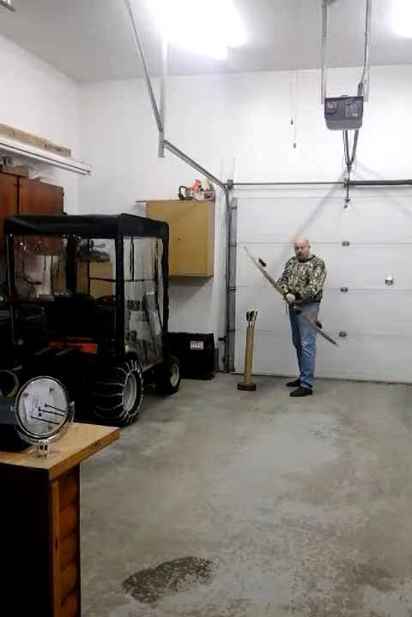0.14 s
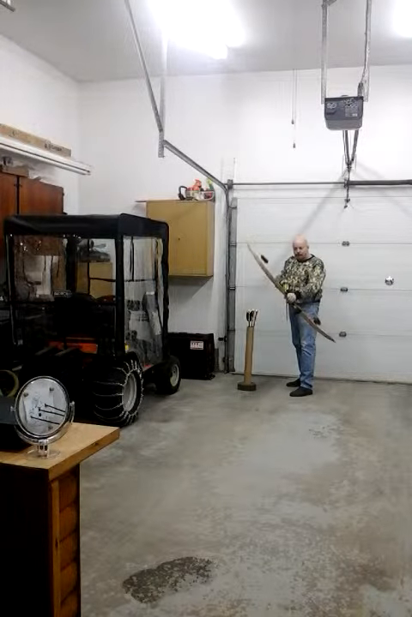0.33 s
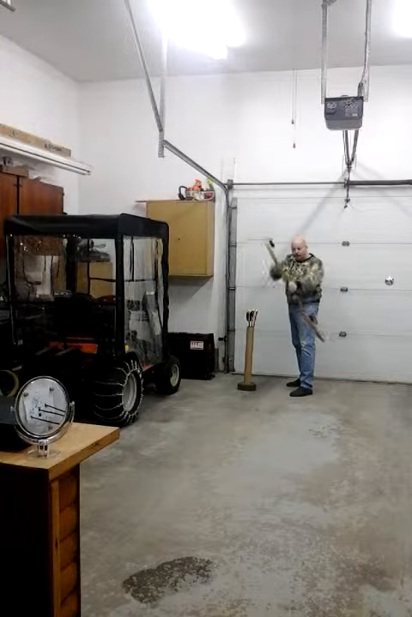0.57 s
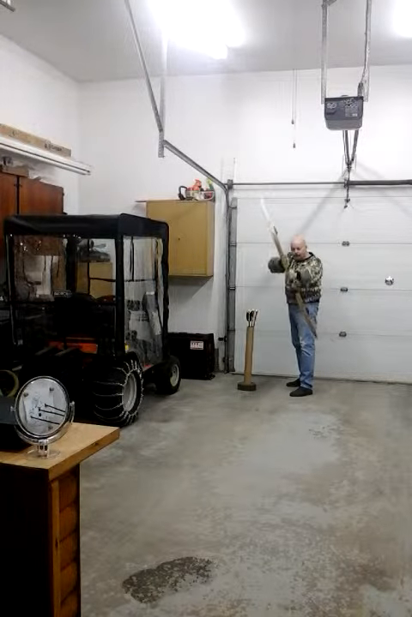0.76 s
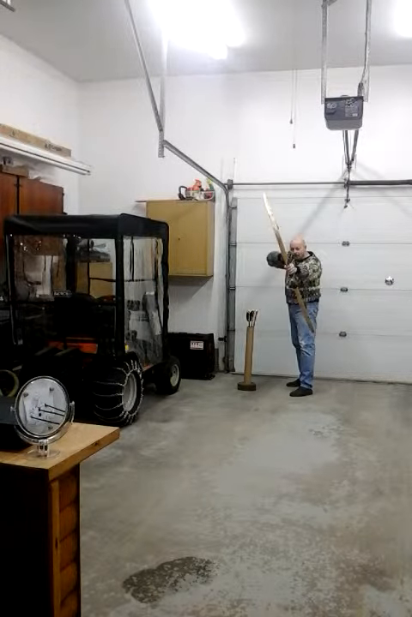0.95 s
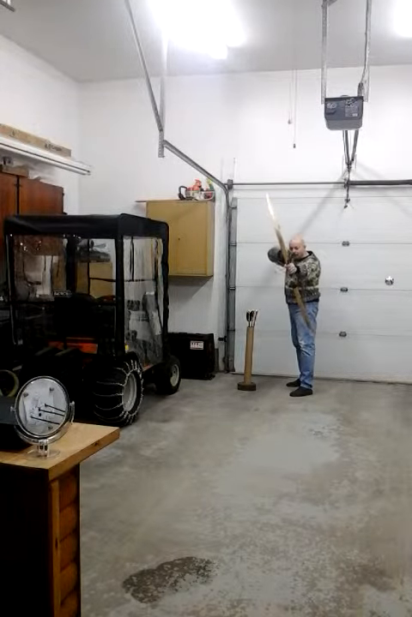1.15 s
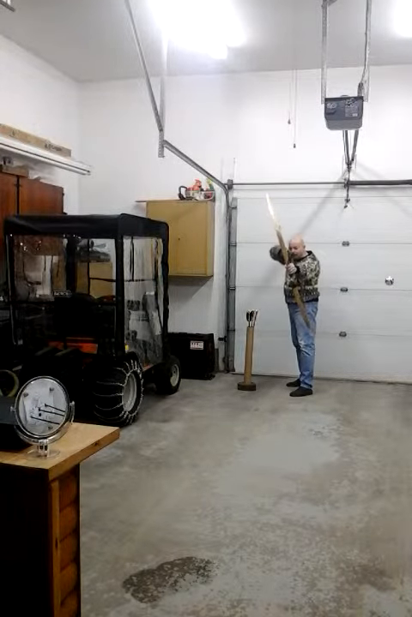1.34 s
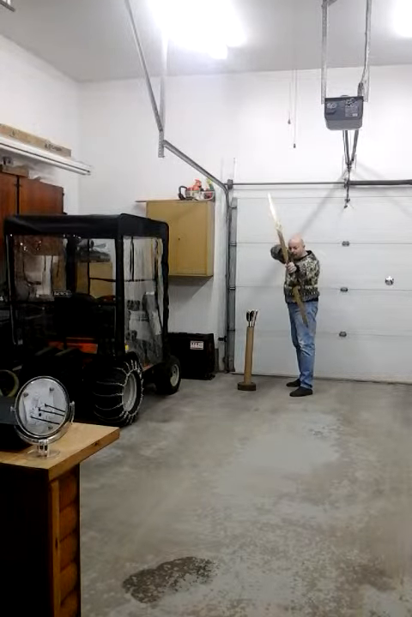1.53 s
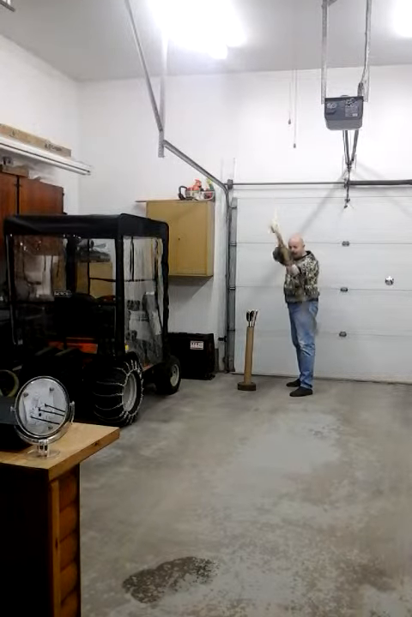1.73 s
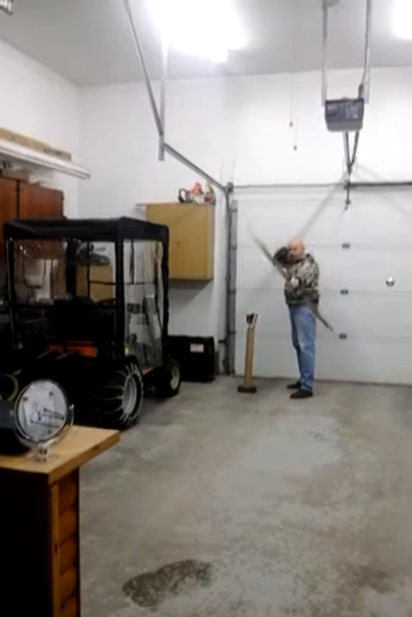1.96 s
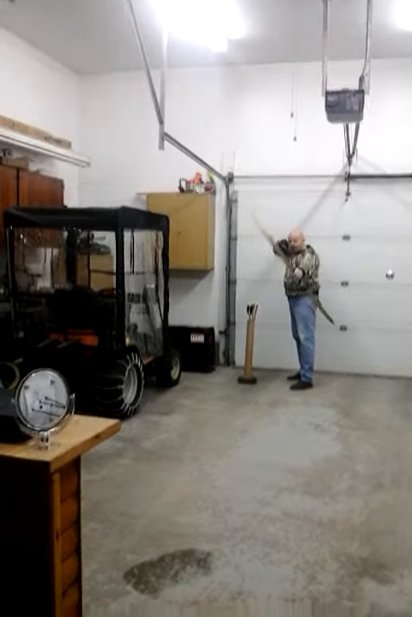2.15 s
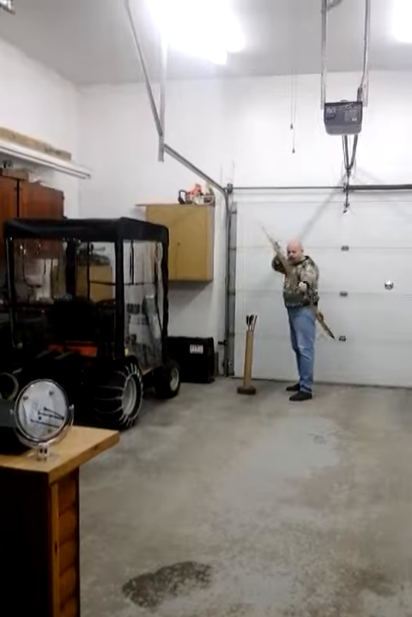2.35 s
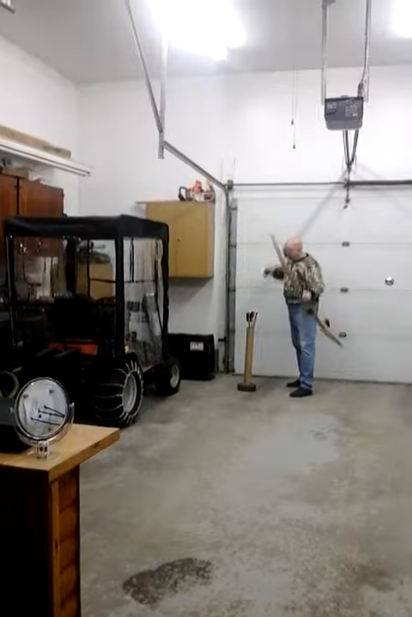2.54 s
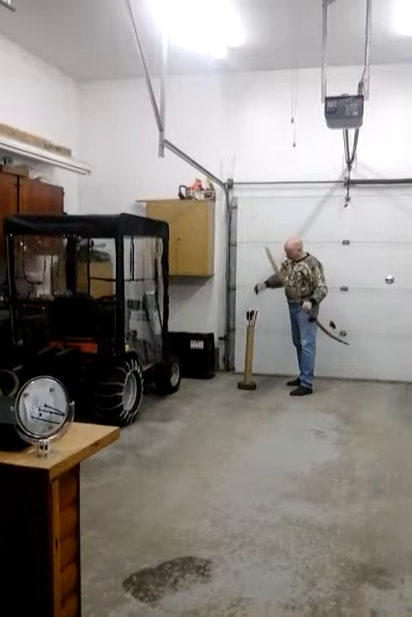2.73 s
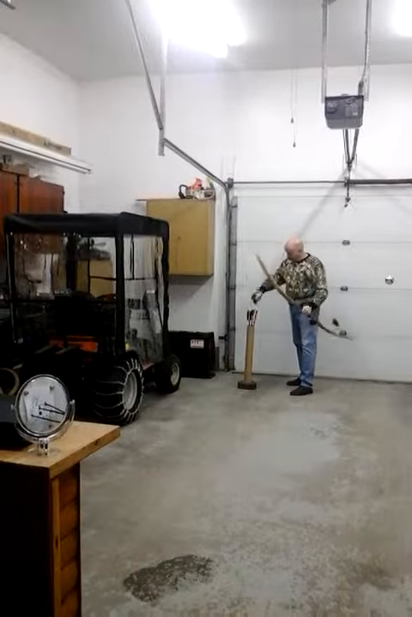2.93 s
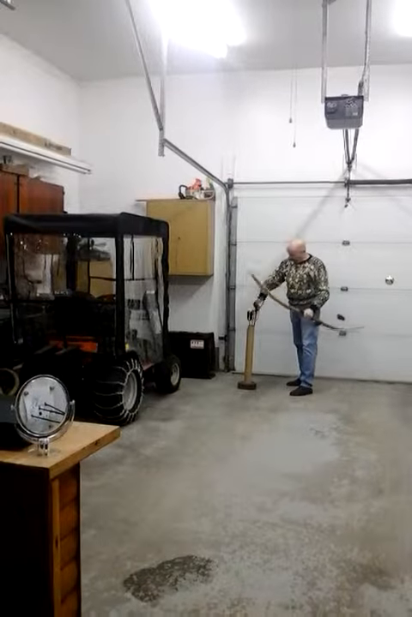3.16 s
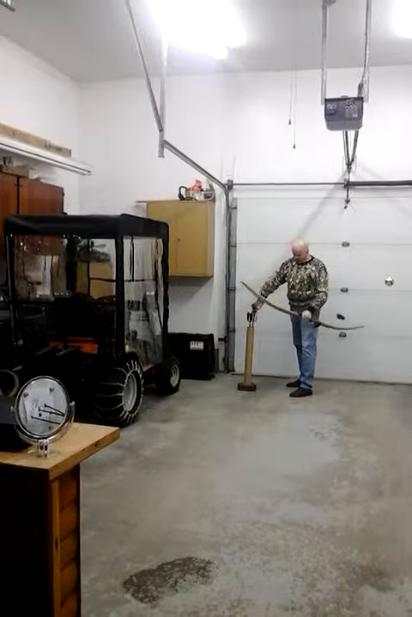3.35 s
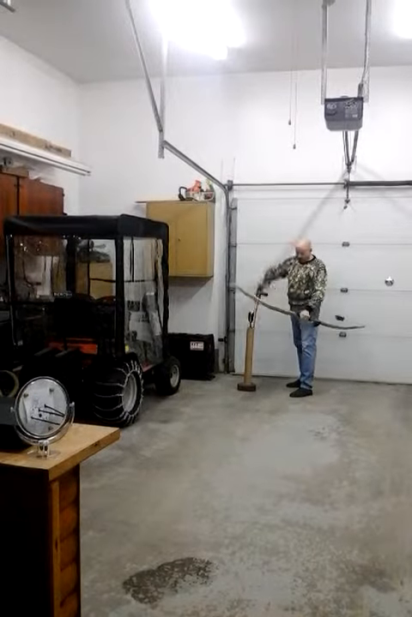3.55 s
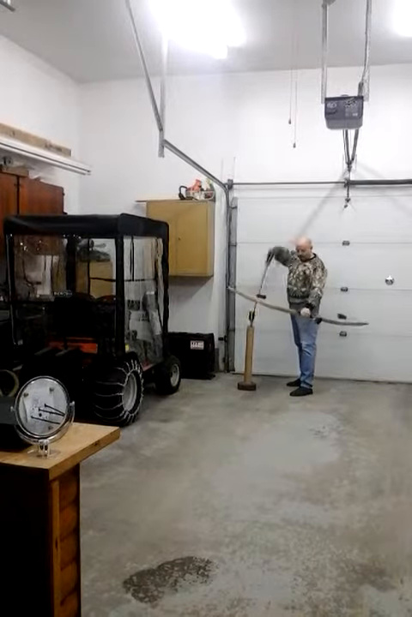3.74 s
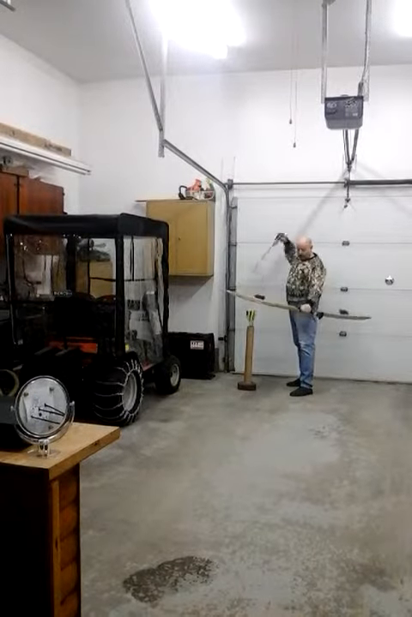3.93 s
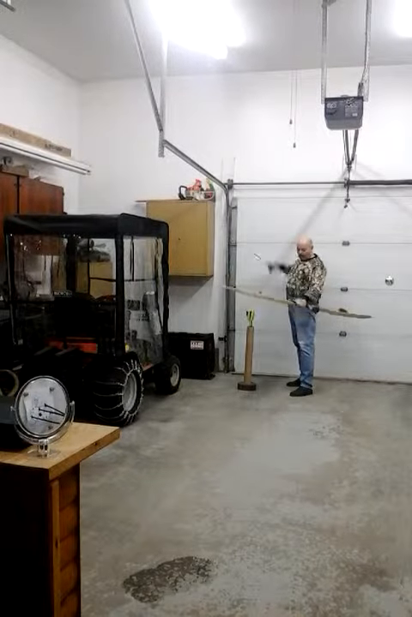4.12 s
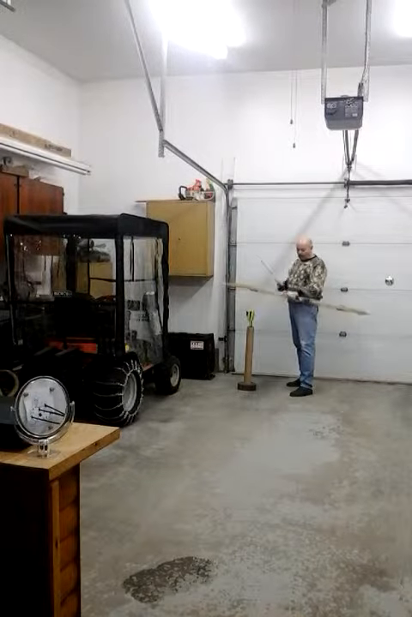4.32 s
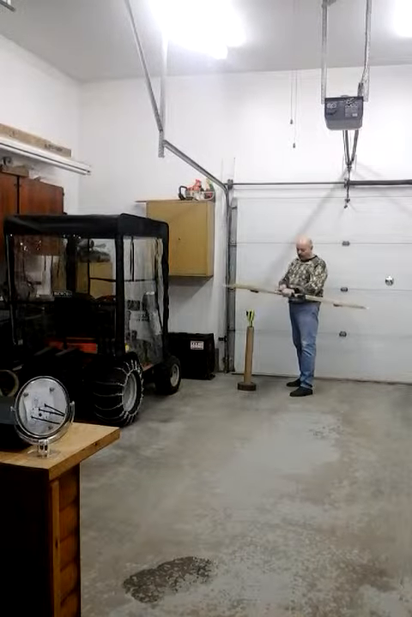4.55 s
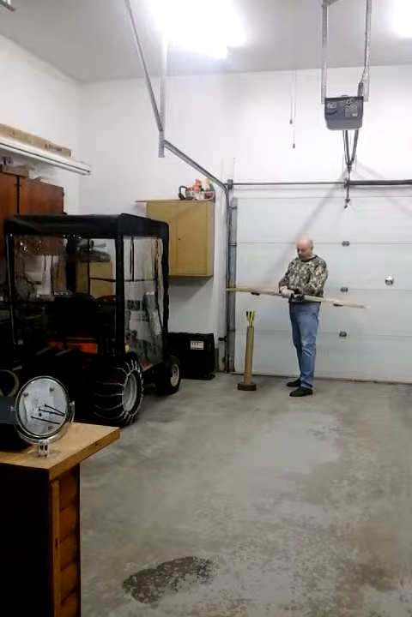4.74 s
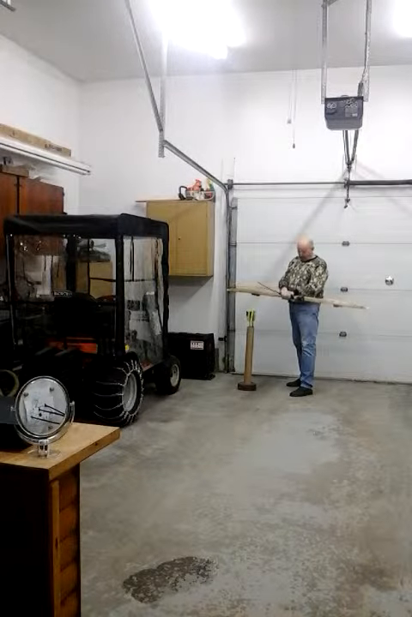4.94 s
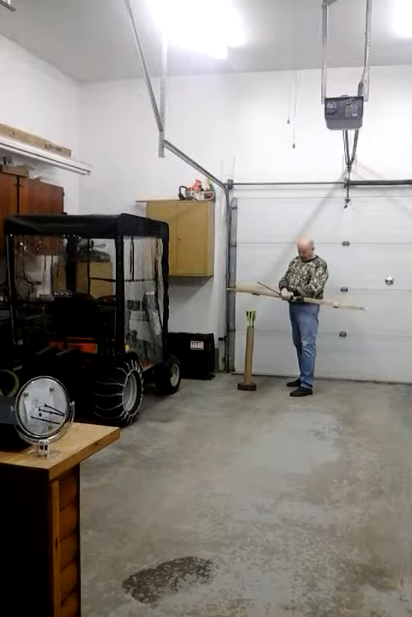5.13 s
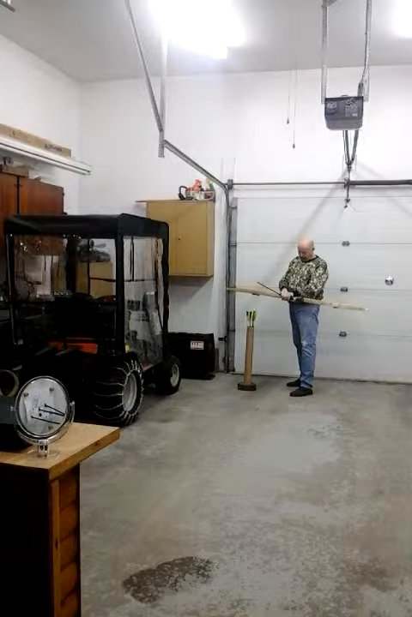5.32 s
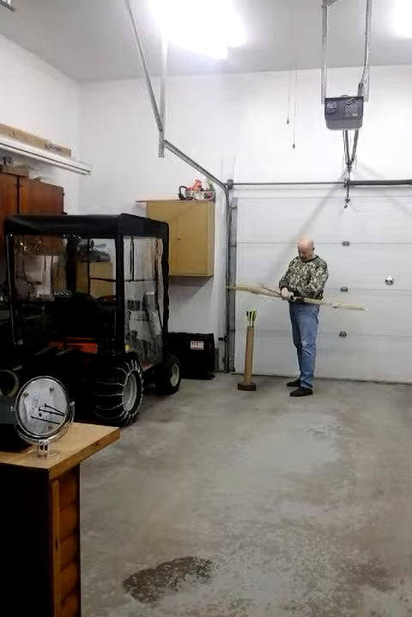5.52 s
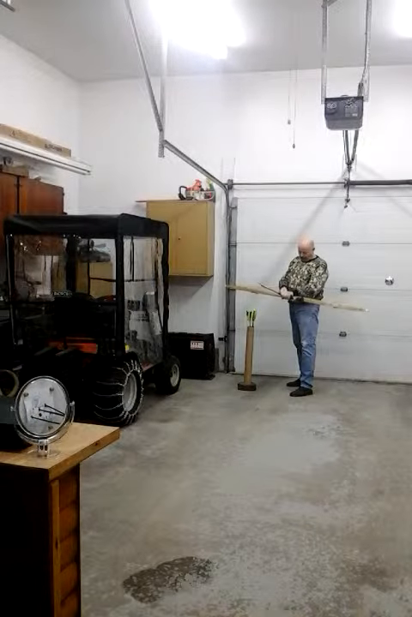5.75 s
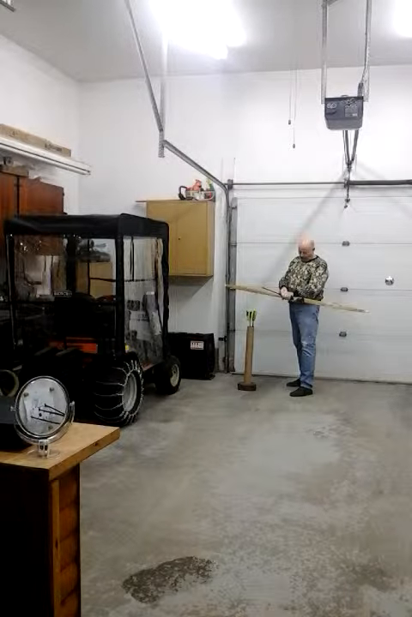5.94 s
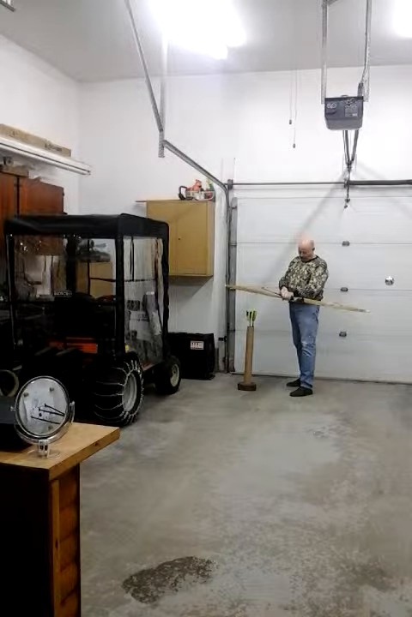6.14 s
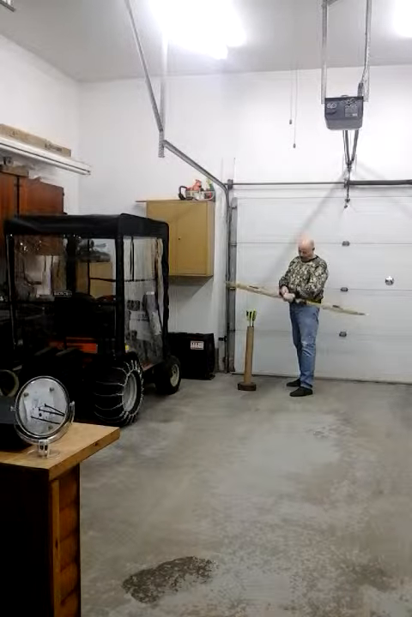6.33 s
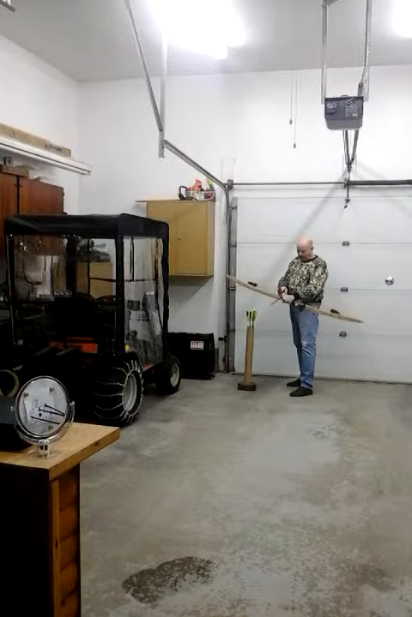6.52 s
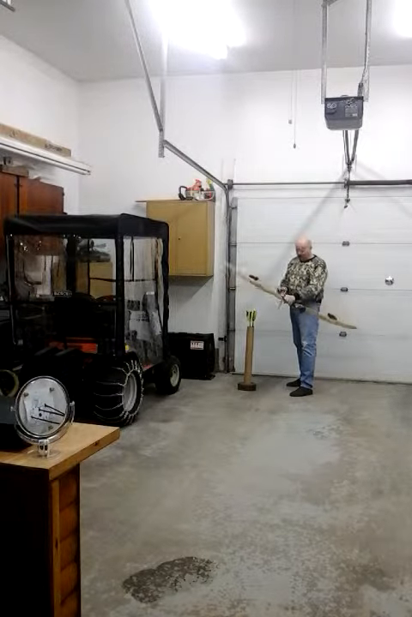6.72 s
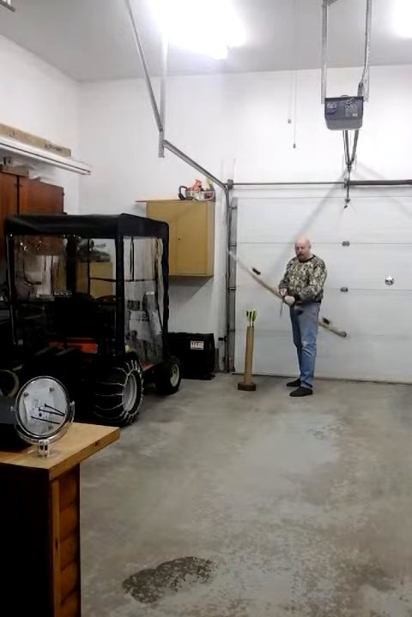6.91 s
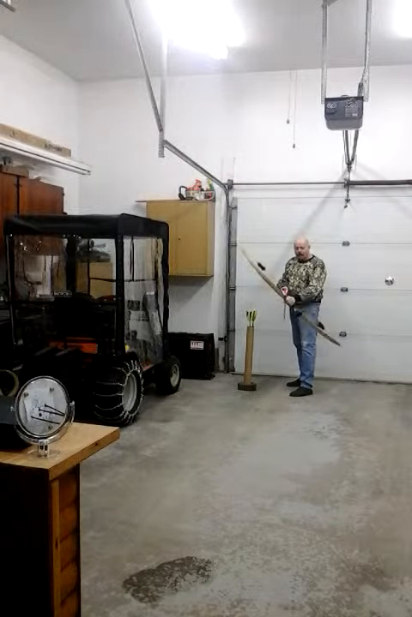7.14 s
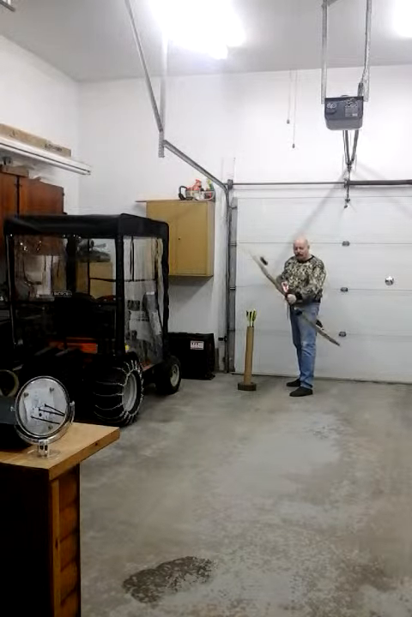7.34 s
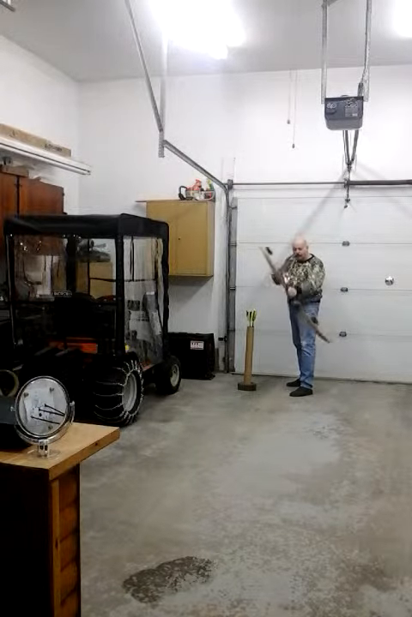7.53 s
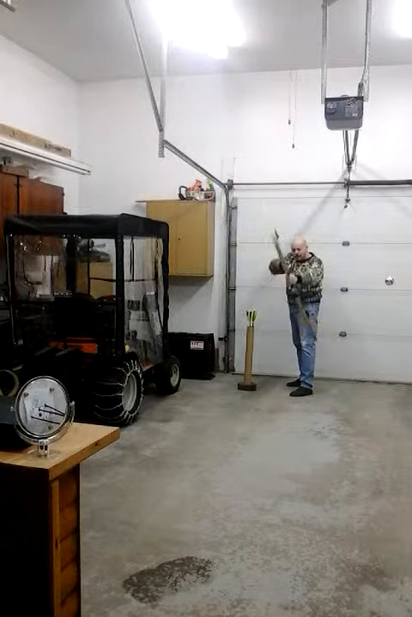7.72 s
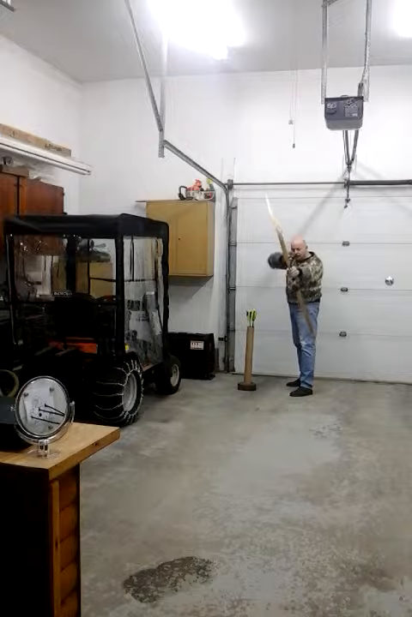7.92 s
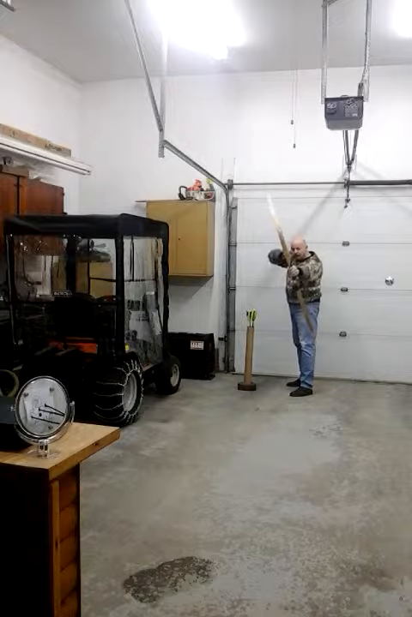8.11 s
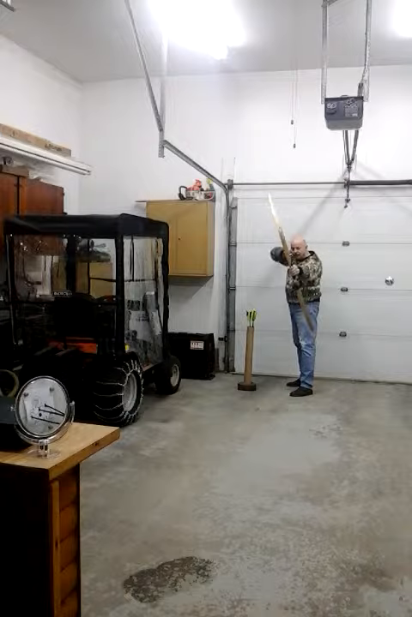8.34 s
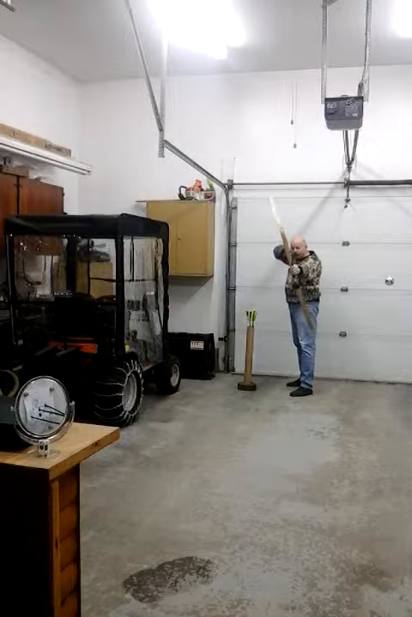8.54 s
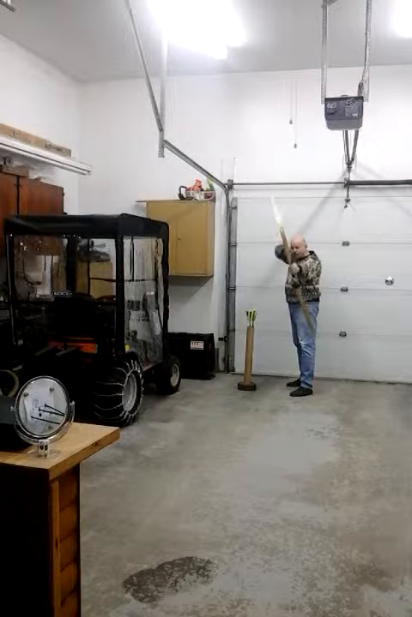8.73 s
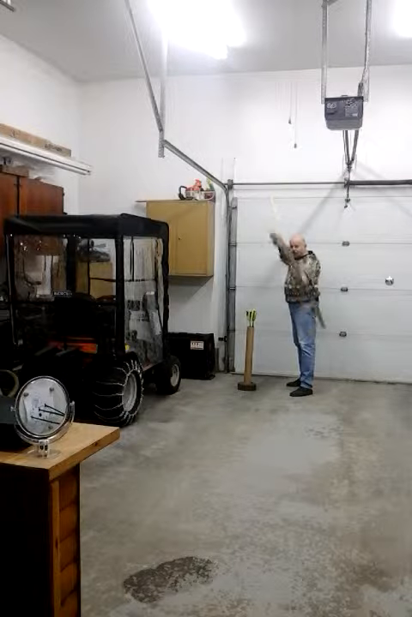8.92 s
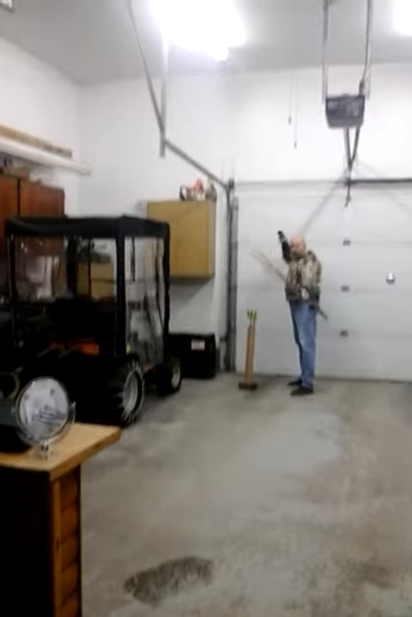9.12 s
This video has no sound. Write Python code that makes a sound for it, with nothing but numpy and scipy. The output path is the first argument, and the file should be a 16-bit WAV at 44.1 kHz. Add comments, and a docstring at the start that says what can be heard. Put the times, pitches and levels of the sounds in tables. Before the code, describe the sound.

Two sharp bow shots, each with a hard target knock a split second later, separated by clattering arrow shafts and small clicks over faint lamp hum.

```python
"""A bare, echoing garage: an archer looses a wooden bow twice, on a bed of lamp hum and room air.
The string cracks as shaped noise and resonances; about 160 ms later the arrow knocks into the target.
Between the shots an arrow rattles out of its stand, as grazes, shaft ringing and hollow knocks.
Small nocking clicks and grainy sleeve rustles fill the gaps.
The microphone pair peaks near 5.7 kHz and hears the archery's bass in opposite phase."""
import sys
import numpy as np
from scipy import signal
from scipy.fft import rfft, irfft, next_fast_len
from scipy.io import wavfile
from scipy.ndimage import uniform_filter1d

SR = 44100
rng = np.random.default_rng(int(sys.argv[2]) if len(sys.argv) > 2 else 0)


def wrap_up_sound(samples):
    """Save the sound to the file named by the first command line argument, as 16-bit audio."""
    columns = np.atleast_2d(samples).T
    # keep every value between -1 and 1, then stretch to whole-number steps
    tamed = np.clip(columns, -1, 1)
    steps = np.round(tamed * 32767).astype(np.int16)
    wavfile.write(sys.argv[1], SR, steps)


N = 408807
MAINS_HZ = 60

# ringing of the loose arrow shaft: (frequency [Hz], level [dB], t60 [s])
SHAFT_RING = [(1270, -20, 0.2), (2245, -10, 0.062), (2910, -8.5, 0.091), (3460, -0.5, 0.1),
              (4315, 6.5, 0.049), (4870, -3, 0.09), (5710, -1.5, 0.091)]


def amp(db):
    """Decibels to gain."""
    return 10 ** (np.asarray(db) / 20)


def unit(x):
    """x at rms 1."""
    return x / np.sqrt(np.mean(x ** 2) + 1e-20)


def along(points, hz):
    """(Hz, value) points read on a log frequency axis."""
    point_hz, values = np.transpose(points)
    return np.interp(np.log(hz + 1), np.log(point_hz), values)


def second():
    """The times and the frequencies of a one-second sound."""
    return np.arange(SR) / SR, np.fft.rfftfreq(SR, 1 / SR)


def filtered(x, response):
    """x, as long as the scene, through a response given as a function of frequency."""
    size = next_fast_len(N + SR // 2)
    spectrum = rfft(x, size) * response(np.fft.rfftfreq(size, 1 / SR))
    return irfft(spectrum, size)[..., :N]


def causal(x, gain):
    """One second of sound through the minimum-phase filter with this gain, so nothing rings early."""
    cepstrum = irfft(np.log(gain), SR)
    # fold the cepstrum onto positive time
    cepstrum[1:SR // 2] *= 2
    cepstrum[SR // 2 + 1:] = 0
    return irfft(rfft(x) * np.exp(rfft(cepstrum)), SR)


def coloured(x, spectrum):
    """One second of sound shaped by a (Hz, dB) curve."""
    return causal(x, amp(along(spectrum, second()[1])))


def even(x, smooth_hz=400):
    """A burst evened out so that it has no broad colour of its own."""
    # one bin is 1 Hz wide
    power = uniform_filter1d(np.abs(rfft(x)) ** 2, size=round(smooth_hz))
    return causal(x, (np.abs(power) + 1e-9) ** -.5)


def resonate(x, modes):
    """One second of sound through parallel (Hz, width Hz, dB) resonances of alternating sign."""
    f = second()[1]
    body = 0
    for k, (centre, width, db) in enumerate(modes):
        damping = 1j * f * width
        body = body + (-1) ** k * amp(db) * damping / (centre * centre - f * f + damping)
    return irfft(rfft(x) * body, SR)


def ringing(modes, attack_s=.002):
    """Decaying sine (Hz, dB, t60 s) modes, struck at new strengths every time."""
    t = second()[0]
    ring = np.zeros(SR)
    for hz, level_db, t60 in modes:
        struck_db = level_db + rng.normal(0, 0.96)
        ring += amp(struck_db - 60 * t / t60) * np.sin(2 * np.pi * hz * t)
    return ring * (1 - np.exp(-t / attack_s))


def contact(t60, grit):
    """A sharp push together with a dying crunch."""
    t = second()[0]
    crunch = rng.standard_normal(SR) * amp(-60 * t / t60)
    return even((t == 0) + grit * crunch / np.linalg.norm(crunch))


def graze(rise_s, fall_s, lead_s):
    """A brief scrape that swells to its peak at lead_s and dies away."""
    t = second()[0] - lead_s
    swell = np.exp(np.minimum(t / rise_s, -t / fall_s))
    return even(rng.standard_normal(SR) * swell)


def rub(length_s, grain_db=4):
    """One grainy stroke of cloth or fingers: noise of jumpy strength under a half-sine swell."""
    # cloth spectrum: (frequency [Hz], level per Hz [dB])
    cloth = [(60, -26.5), (200, 1), (700, 0.5), (1500, -3), (3300, -4), (4700, 0), (5800, 3), (7500, -6.5),
             (10000, -11), (15000, -24.5)]
    stroke = np.sin(np.pi * np.minimum(second()[0] / length_s, 1))
    grain = amp(grain_db * rng.standard_normal(SR))
    return coloured(stroke * rng.standard_normal(SR) * grain, cloth)


def garage(x, db, direct=0, echo=0, echo_s=0.059, build_s=0.0019):
    """x in a decaying noise tail, as sum and difference channels; its first 0.1 s has rms level db."""
    # reverberation of the garage: (frequency [Hz], t60 [s])
    decay = [(80, 0.34), (250, .8), (700, 0.88), (1800, 0.98), (3000, 0.87), (5500, 0.72), (8000, .55),
             (14000, 0.16)]
    hz, s, cells = signal.stft(rng.standard_normal((2, SR)), SR, nperseg=256)
    cells = cells * amp(-60 * s / along(decay, hz)[:, None])
    tail = signal.istft(cells, SR, nperseg=256)[1][:, :SR]
    tail *= 1 - np.exp(-second()[0] / build_s)
    tail /= np.linalg.norm(tail[0])
    # the far wall throws back a bunch of reflections
    tail *= 1 + echo * np.exp(-((second()[0] - echo_s) / 0.003) ** 2)
    tail[:, 0] += direct
    wet = signal.fftconvolve(x[None], tail, axes=1)
    return amp(db) * wet / np.sqrt(np.mean(wet[:, :SR // 10] ** 2))


def add(track, s, sound):
    """Mix a sound into the track at time s."""
    room = track[:, round(s * SR):][:, :sound.shape[1]]
    room += sound[:, :room.shape[1]]


def air(level_db=-60.5):
    """A steady low rush with faint hiss: shaped noise, unrelated between left and right."""
    # room air spectrum: (frequency [Hz], level per Hz [dB])
    rush = [(25, -15.5), (70, -13), (130, -4.5), (200, -3.5), (300, -7), (500, -11.5), (900, -16.5),
            (1600, -17.5), (2500, -22.5), (4200, -20.5), (5600, -19), (7500, -23), (14000, -24.5)]
    noise = rng.standard_normal((2, N))
    return amp(level_db) * unit(filtered(noise, lambda hz: amp(along(rush, hz))))


def harmonics(level_db=-81.0, fall_db_per_octave=5.0, right_db=5, scatter_db=2, count=24):
    """The hum's lines: strong ones, and between them weak multiples of twice the mains, fading upwards."""
    # strong mains harmonics: (frequency [Hz], left level [dB], right level [dB])
    strong = [(120, -68, -67), (240, -60, -60), (360, -59, -72), (480, -64, -63), (600, -72, -64),
              (1200, -76, -73), (1680, -73, -75), (1800, -76, -73)]
    strong_hz = [row[0] for row in strong]
    weak = []
    for hz in 2 * MAINS_HZ * np.arange(1, count + 1):
        # level_db applies at 1 kHz
        db = level_db - fall_db_per_octave * np.log2(hz / 10 ** 3) + rng.normal(0, scatter_db)
        if hz not in strong_hz:
            weak.append((hz, db - right_db / 2, db + right_db / 2))
    return strong + weak


def lamps(waver_db=1.3, waver_rate=3, buzz_db=-77):
    """Fluorescent ballasts hum on mains harmonics, each wavering a little, over a faint buzz."""
    out, t = np.zeros((2, N)), np.arange(N) / SR
    # waver_rate new random levels per second
    knots = np.arange(0, N / SR + 1, 1 / waver_rate)
    for hz, left_db, right_db in harmonics():
        # radians between the sides: nearly opposed in the low lines
        apart = 3.0 if hz < 800 else rng.uniform(-1, 1)
        phase = 2 * np.pi * (hz * t + rng.random()) + np.array([[0], [apart]])
        waver = np.interp(t, knots, rng.standard_normal(len(knots)))
        level = np.sqrt(2) * amp([[left_db], [right_db]]) * amp(waver_db * waver)
        out += level * np.sin(phase)
    # the same crackle repeats in every mains cycle
    cycle = SR // MAINS_HZ
    crackle = rng.standard_normal((2, cycle))[:, np.arange(N) % cycle]
    buzz_curve = [(900, -19.5), (1500, -3.0), (3000, 8), (4500, -22)]
    buzz = unit(filtered(crackle, lambda hz: amp(along(buzz_curve, hz))))
    return out + amp(buzz_db) * buzz


def sleeves(stroke_s=0.11, gap_s=.11, rustle_db=-63.5, scatter_db=1.0):
    """Cloth rubs in a few louder strokes, and in runs of faint uneven ones whenever the archer moves."""
    # louder strokes: (time [s], length [s], level [dB])
    rubs = [(0.101, 0.08, -57), (1.17, 0.06, -54.5), (3.179, 0.1, -55), (6.567, 0.127, -51)]
    # spells of faint jacket rustle: (start [s], end [s])
    moves = [(0.171, .33), (4.15, 4.26), (6.8, 7.36), (8.14, 8.24)]
    out, strokes = np.zeros((2, N)), list(rubs)
    for start, end in moves:
        count = max(1, round((end - start) / gap_s))
        for s in np.linspace(start, end, count, endpoint=False):
            late_s = gap_s * rng.uniform(0, .3)
            strokes.append((s + late_s, stroke_s, rustle_db + rng.normal(0, scatter_db)))
    for s, length_s, db in strokes:
        add(out, s, garage(rub(length_s), db, direct=0.36))
    return out


def nocking(ring_db=-11.5, slide_s=0.073, slide_db=-64):
    """Fingers slide along the shaft, then nock or bow clicks and the shaft rings."""
    # small clicks of nock and bow: (time [s], level [dB])
    clicks = [(0.37, -59.5), (5.051, -55), (5.212, -50.5), (6.285, -39.5), (7.184, -54), (7.632, -62.5)]
    # click spectrum: (frequency [Hz], level per Hz [dB])
    nock = [(80, -40), (300, 1), (900, -4.5), (2500, -3), (4500, -1), (6000, 4.5), (7500, -4.5),
            (10000, -16), (15000, -28)]
    out = np.zeros((2, N))
    for s, db in clicks:
        add(out, s - slide_s, garage(rub(slide_s), slide_db, direct=0.33))
        click = coloured(graze(rise_s=0.0039, fall_s=.006, lead_s=0.016), nock)
        add(out, s - .015, garage(click, db, direct=0.66))
        add(out, s - .002, garage(ringing(SHAFT_RING), db + ring_db, direct=1.0))
    return out


def arrows(free_ring_db=0, held_ring_db=-15, grip_s=0.067, into_stand_db=-21, reach_s=.066, reach_db=-52):
    """A hand draws an arrow: it clatters, rings less as the grip closes, and knocks the hollow stand."""
    # the shaft clatters against the other arrows: (time [s], level [dB])
    taps = [(3.507, -33.5), (3.586, -26), (3.599, -22.5), (3.691, -33), (3.749, -38.5), (3.885, -43)]
    # the point bumps the stand: (time [s], level [dB])
    knocks = [(3.265, -56), (3.735, -33.5)]
    # shaft tap spectrum: (frequency [Hz], level per Hz [dB])
    shaft = [(100, -46), (400, -50), (800, -27), (1400, -8.5), (2300, -8.5), (3200, -4), (4700, -0.5),
             (5700, 3), (7000, -5), (9000, -19.5), (14000, -50)]
    # resonances of the hollow stand: (frequency [Hz], width [Hz], level [dB])
    stand = [(390, 190, -8.5), (594, 140, -6), (890, 75, -1.5), (1530, 120, -17)]
    out, first_s = np.zeros((2, N)), taps[0][0]
    add(out, first_s - reach_s, garage(rub(reach_s), reach_db, direct=0.4))
    for s, db in taps:
        tap = coloured(graze(rise_s=0.0037, fall_s=.007, lead_s=.015), shaft)
        add(out, s - .015, garage(tap, db, direct=0.76))
        looseness = np.exp((first_s - s) / grip_s)
        ring_db = held_ring_db + (free_ring_db - held_ring_db) * looseness
        add(out, s - .002, garage(ringing(SHAFT_RING), db + ring_db, direct=1.0))
    # every tap also reaches the stand
    for s, db in knocks + [(s, db + into_stand_db) for s, db in taps]:
        hollow = resonate(contact(t60=0.03, grit=0.68), stand)
        knock = coloured(hollow, [(100, -27), (350, -7)])
        add(out, s, garage(knock, db, direct=0.75))
    return out


def target(panel_width_hz=720, crack_over_thud_db=0.36, ring_db=-26.5):
    """The point cracks through the face; the block thuds, its panel booms and the backstop rings."""
    # arrow hits: (time [s], thud level [dB], panel frequency where hit [Hz], panel level [dB])
    strikes = [(1.917, -15, 802, -16), (9.067, -17, 1190, -14.5)]
    # spectra of block thud and point crack: (frequency [Hz], level per Hz [dB])
    thud_curve = [(25, -21), (85, -6.5), (200, -6), (330, 1), (500, 0), (800, -14), (1500, -10.5),
                  (3000, -29.5), (8000, -59)]
    crack_curve = [(300, -19.5), (1500, -5), (2700, 0.5), (4000, -1.5), (5800, 4), (7500, -5),
                   (10000, -15.5), (15000, -36.5)]
    # ringing of frame and backstop: (frequency [Hz], level [dB], t60 [s])
    backstop = [(524, -5, .3), (649, -3, .25), (788, -2.5, 0.12), (844, -4.5, .15), (959, 1, 0.24),
                (1067, -0.5, 0.18), (1257, 0.5, 0.27), (1466, 0.5, 0.24), (2126, -5.5, .25),
                (2980, -7.5, 0.91), (3090, -7, 0.32), (5600, -6, 0.33)]
    out = np.zeros((2, N))
    for s, thud_db, panel_hz, panel_db in strikes:
        thud = coloured(contact(t60=0.054, grit=1.1), thud_curve)
        add(out, s, garage(thud, thud_db, direct=0.69))
        panel = [(panel_hz, panel_width_hz, 0)]
        # two passes steepen the panel's resonance
        boom = resonate(resonate(contact(t60=0.032, grit=0.97), panel), panel)
        add(out, s, garage(boom, panel_db, direct=0.16, echo=1.4))
        crack = coloured(contact(t60=0.035, grit=2.7), crack_curve)
        add(out, s + .003, garage(crack, thud_db + crack_over_thud_db, direct=0.23, echo=0.39))
        add(out, s, garage(ringing(backstop), ring_db, direct=.3))
    return out


def bow(db=-17, slip_s=.024, slip_db=-18, rise_s=0.012, ring_db=-2, twang_db=-30, twang_hz=395,
        twang_t60=0.31, upper_db=-6, rebound_s=.075, rebound_db=-9):
    """The string slips off the fingers, whips the arrow along the bow, rebounds and twangs."""
    # the string is loosed: (time [s], scrape t60 [s])
    releases = [(1.753, 0.036), (8.914, .07)]
    # bow scrape spectrum: (frequency [Hz], level per Hz [dB])
    scrape_curve = [(40, -33.5), (150, -16), (380, -8), (700, -7), (1050, -7.5), (1400, -5.5), (2450, -6),
                    (3000, -5), (4200, -6), (5600, -4.5), (6700, -9), (8500, -19.5), (11000, -40.5),
                    (15000, -49.5)]
    # limbs and shaft ring as the arrow leaves: (frequency [Hz], width [Hz], level [dB])
    limbs = [(660, 79, -5), (980, 72, -3.5), (1880, 220, -6.5), (2385, 97, 1), (3035, 110, -4),
             (3640, 65, -10), (5060, 150, -7), (5730, 120, -6.5)]
    out, t = np.zeros((2, N)), second()[0]
    for s, scrape_t60 in releases:
        slip = rng.standard_normal(SR) * np.minimum(t / slip_s, 1) * (t < slip_s)
        add(out, s - slip_s, garage(coloured(slip, scrape_curve), db + slip_db, direct=0.55))
        swell = (1 - np.exp(-t / rise_s)) ** 2 * amp(-60 * t / scrape_t60)
        scrape = even(rng.standard_normal(SR) * swell)
        add(out, s - .006, garage(coloured(scrape, scrape_curve), db, direct=0.62))
        add(out, s - .003, garage(resonate(scrape, limbs), db + ring_db, direct=0.58))
        # the rebound repeats the scrape more softly
        add(out, s + rebound_s, garage(coloured(scrape, scrape_curve), db + rebound_db, direct=0.34))
        # the string's pitch sags to twang_hz as its swing dies
        phase = 2 * np.pi * twang_hz * np.cumsum(1 + 0.099 * np.exp(-t / 0.041)) / SR
        tone = np.sin(phase) + amp(upper_db) * np.sin(2.1 * phase)
        twang = tone * (1 - np.exp(-t / 0.084)) * amp(-60 * t / twang_t60)
        add(out, s + 0.011, garage(twang, twang_db, direct=.2))
    return out


def microphones(pair):
    """Sum and difference channels become left and right, opposed in the bass."""
    # left-right likeness: (frequency [Hz], correlation [-1 to 1])
    alike = [(60, -.96), (470, -.88), (720, -.1), (1150, .5), (1600, -.15), (2500, 0)]

    def mix(hz):
        turn = np.arccos(np.clip(along(alike, hz), -.99, .99)) / 2
        return np.array([np.cos(turn), np.sin(turn)])

    mid, side = filtered(pair, mix)
    return np.array([mid + side, mid - side])


def scene():
    """The archery leans mostly right, with its top end to the left; hum and air fill the room."""
    # balance between the sides: (frequency [Hz], left minus right [dB])
    lean = [(200, -1.5), (380, 1), (690, -6), (1280, -4.5), (2350, -3), (5400, -6), (7500, 3.5),
            (12000, 3.5)]
    # treble peak of the microphones: (frequency [Hz], gain [dB])
    presence = [(4400, -1.5), (5100, 1.5), (5750, 3), (6500, -1.5)]
    archery = microphones(bow() + target() + arrows() + nocking() + sleeves())
    halves = np.array([[.5], [-.5]])
    placed = filtered(archery, lambda hz: amp(along(presence, hz) + halves * along(lean, hz)))
    return placed + air() + lamps()


def record(dry, top_hz=14800):
    """Peaks near full scale are rounded off, and nothing is kept above the band limit."""
    rounded = dry / (1 + np.abs(dry) ** 6) ** (1 / 6)
    return filtered(rounded, lambda hz: hz < top_hz)


dry = scene()
out = record(dry)
wrap_up_sound(out)
```